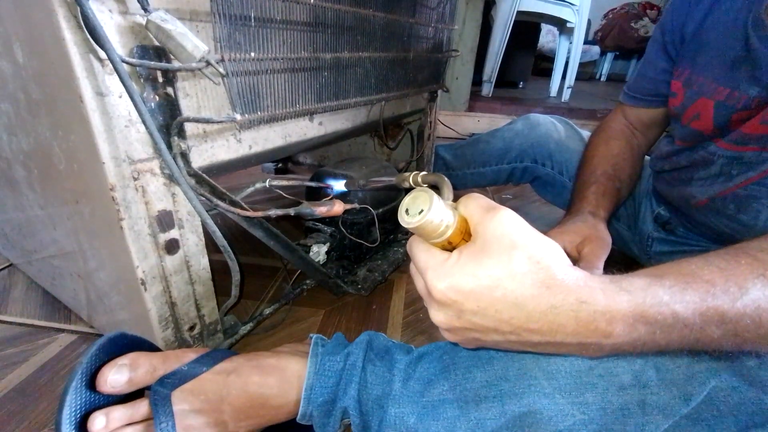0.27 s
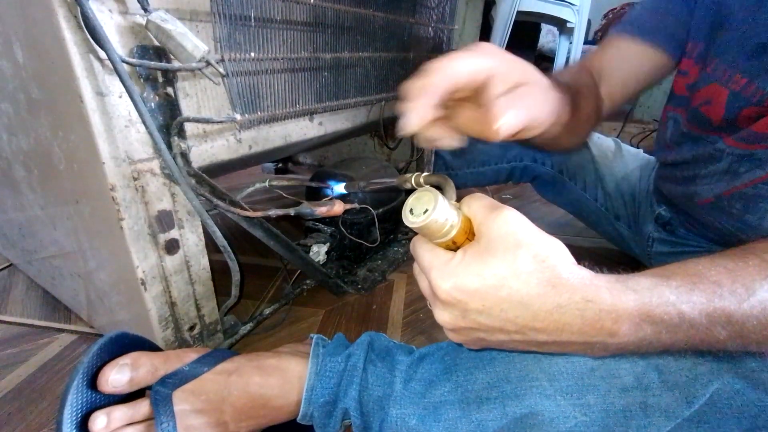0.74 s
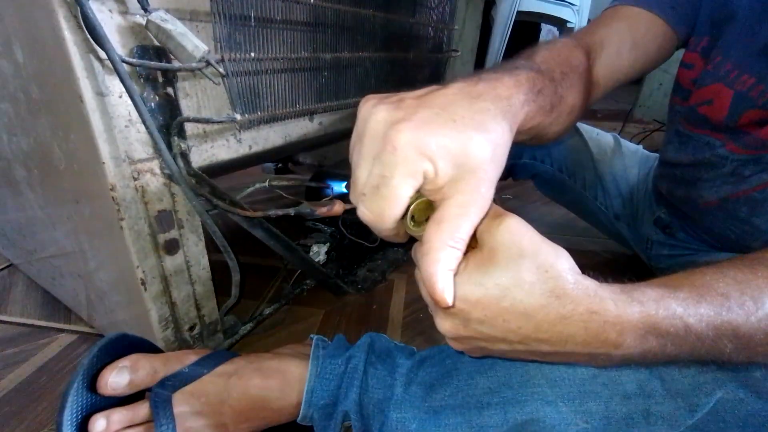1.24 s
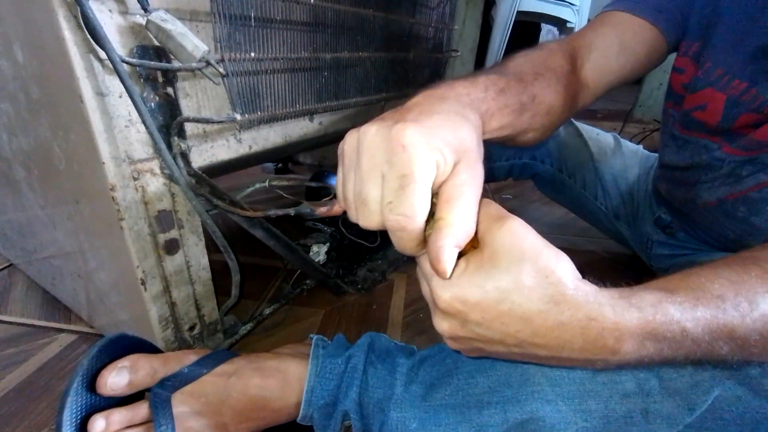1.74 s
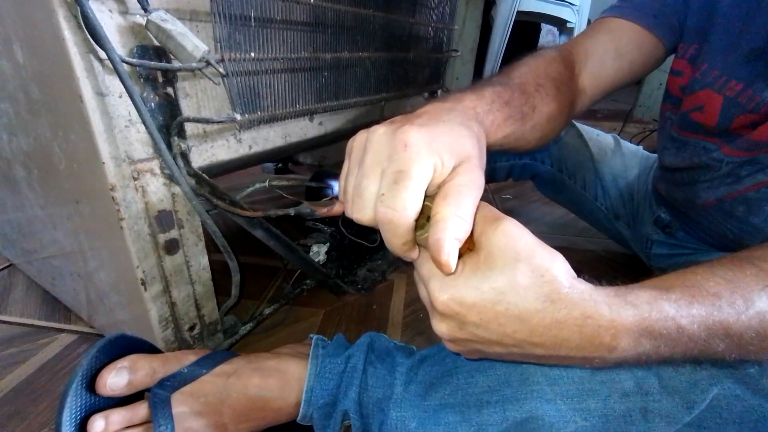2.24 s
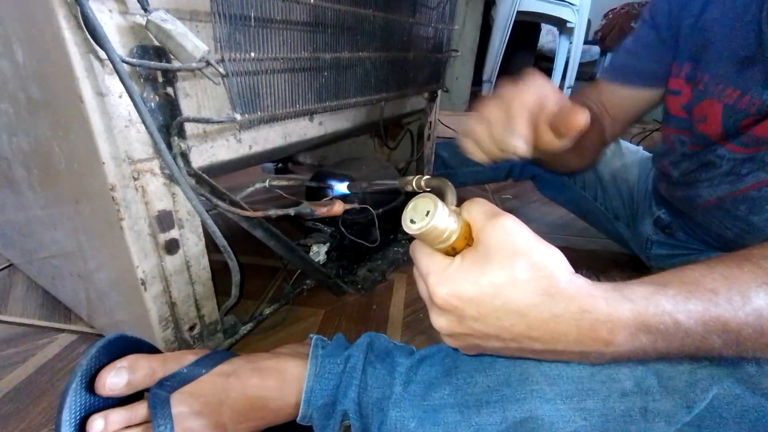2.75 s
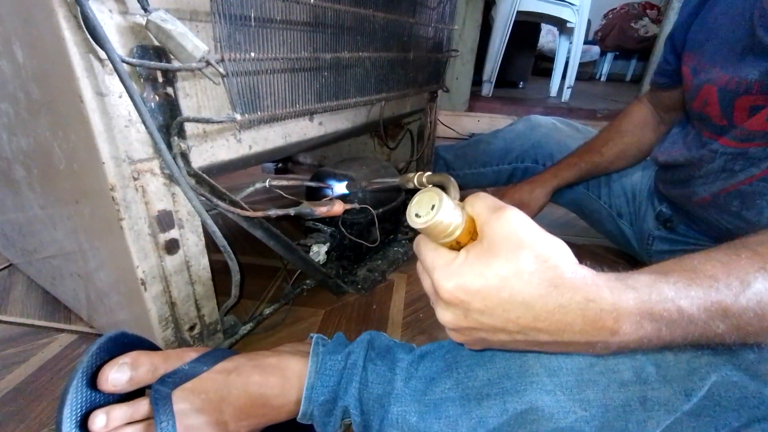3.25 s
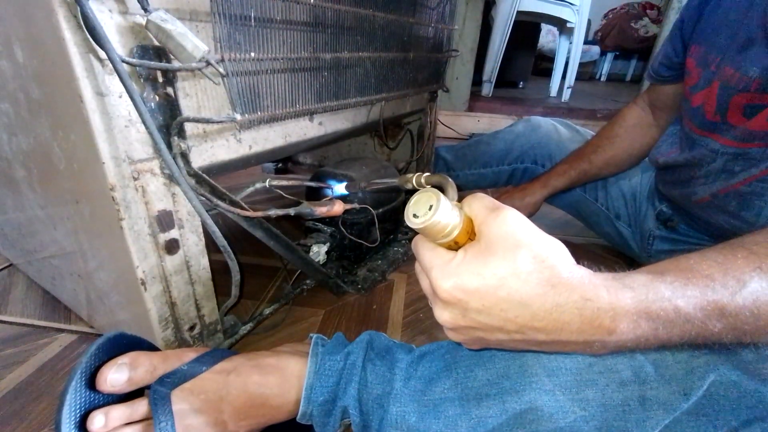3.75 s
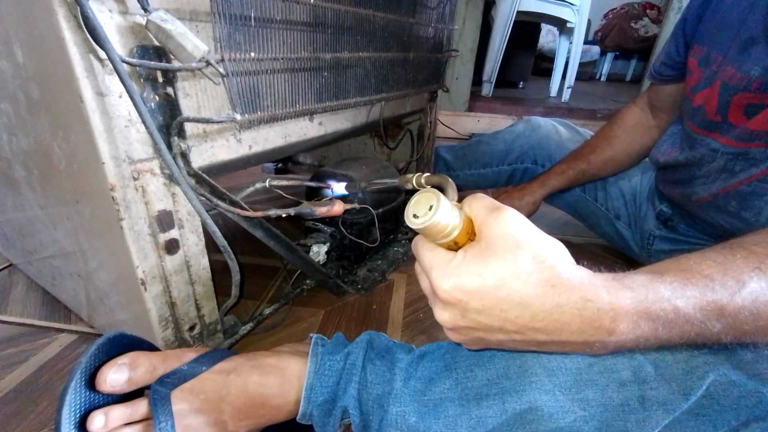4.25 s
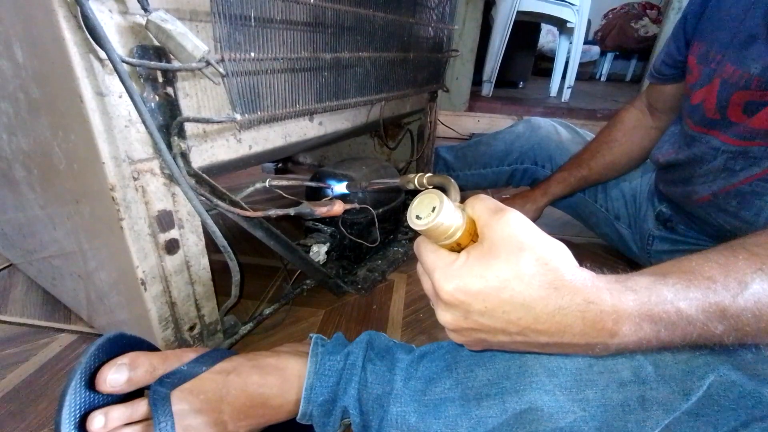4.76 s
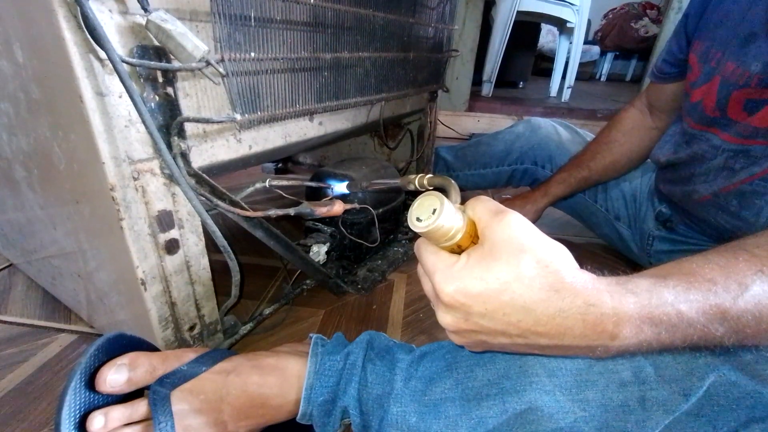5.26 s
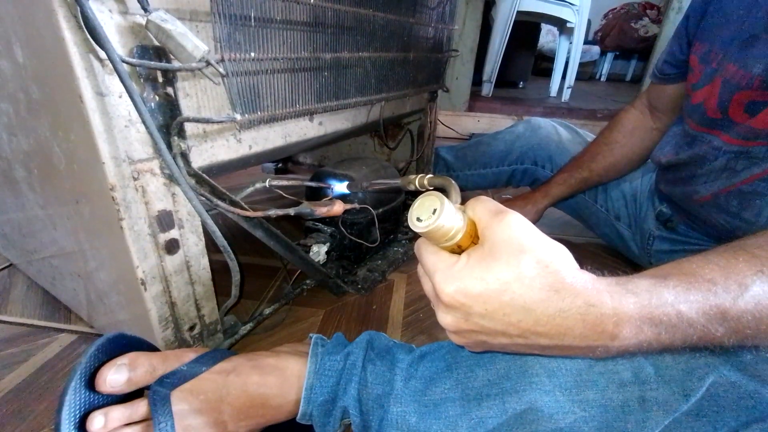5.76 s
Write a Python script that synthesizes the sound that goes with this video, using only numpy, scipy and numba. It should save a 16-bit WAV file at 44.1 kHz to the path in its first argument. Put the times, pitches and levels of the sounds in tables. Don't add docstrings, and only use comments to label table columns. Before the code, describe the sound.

Steady rushing burn of a small gas torch with a hoarse, wandering airy whistle; the valve opens slightly, flame swells, and a knob softly ticks.

```python
import sys
import numpy as np
from scipy import signal
from scipy.fft import rfft, irfft, next_fast_len
from scipy.io import wavfile
from scipy.ndimage import uniform_filter1d
from numba import njit

SR = 44100
rng = np.random.default_rng(int(sys.argv[2]) if len(sys.argv) > 2 else 0)


def transcribe(signal):
    frames = np.atleast_2d(signal).T
    limited = np.clip(frames, -1, 1)
    pcm = np.round(limited * 32767).astype(np.int16)
    wavfile.write(sys.argv[1], SR, pcm)


def volts_from_db(level):
    exponent = np.asarray(level, float) / 20
    return 10 ** exponent


N = 265041
SECONDS = np.arange(N) / SR
SIZE = next_fast_len(N + SR)
HZ = np.maximum(np.arange(SIZE // 2 + 1) * SR / SIZE, 1)

# (time [s], flame strength [dB])
GAS_FLOW = [(0, .5), (.9, -.5), (1.0, 1.5), (1.05, -1), (1.56, 0), (1.6, 4), (1.68, 2), (3.05, 2.5),
            (3.13, 3.5), (3.5, 2.6), (4.1, 3), (4.6, 2.5), (6.01, 2.5)]
# (start [s], rise [s], end [s], fall [s])
REACH, VALVE_TURN = (0.99, .03, 1.53, .06), (1.53, 0.079, 2.29, .45)

# (frequency [Hz], density [dB per Hz])
FLAME_COLOUR = [(20, -36), (45, -45), (100, -27.5), (200, -18.5), (330, -7), (700, -2), (1200, 2),
                (2000, -10), (4000, -9.5), (10500, -13), (10900, -29.5), (13000, -36.5), (15100, -36),
                (15300, -43)]
# (frequency [Hz], width [Hz], level [dB])
RECESS_MODES = [(170, 12, -11), (228.3, 31, 7.5), (259, 47, -5.5), (348.5, 27, 7.5), (391.4, 58, 8.5),
                (488, 61, 4), (660, 35, 2.5), (449.7, 14, -10.5), (558, 54.4, -15.5), (1236, 200, -6),
                (2030, 45, -3.5), (2370, 100, 4), (2830, 80, -5.5), (3090, 125, -4.5), (3286, 140, 3),
                (3725, 176, -7), (4021, 37, 9.5), (4360, 220, -23.5), (4820, 170, -2), (5130, 150, 4),
                (5226, 160, -5.5), (6030, 210, -7.5), (6830, 250, 2.5), (6830, 180, -15), (7660, 550, 7.5),
                (7766, 200, -14.5), (9110, 260, -9), (9490, 200, 6.5), (11900, 250, 8), (11800, 440, -5),
                (14200, 250, -9)]
# (level [dB], slope [dB per dB of flow], under the reaching hand [dB],
# while the valve turns [dB])
FLAME_RANGES = [
    (-30, 0.99, 0.4, 0.04),
    (-30, 0.41, 0.6, 1.2),
    (-49, 3, -5, .1),
    (-28, 0.77, 0.1, -0.2),
]

# (time [s], band centre [Hz])
NOZZLE_GAP = [(0, 1837), (.4, 1766), (.6, 1800), (1.08, 1830), (1.25, 1870), (1.55, 1800), (1.6, 1640),
              (2.05, 1660), (2.3, 1610), (2.45, 1660), (2.77, 1820), (2.92, 1650), (3.65, 1660),
              (4.25, 1630), (4.45, 1800), (4.92, 1630), (5.35, 1740), (6.01, 1740)]
# (time [s], pitch drop [Hz], spread [s], swell [dB])
FLAME_DIPS = [(1.0, 110, 0.035, -0.5), (1.2, 5, 0.041, 6), (1.83, 90, .06, 1.5), (2.54, 210, .04, 3.5),
              (2.92, 10, 0.073, 2.5), (3.48, 45, 0.091, 3), (4.09, 160, .09, 3.5), (5.58, 175, 0.057, 1),
              (5.9, 5, 0.065, 2.5)]
WHISTLE_DB, WHISTLE_PER_FLOW, WHISTLE_DB_PER_HZ, WHISTLE_REACH_DB = -31.5, 1.21, -0.004, -2
REST_HZ, REST_WIDTH_HZ, WIDENING, WIDEST_HZ = 1800, 125, .45, 170
# (frequency [Hz], width [Hz], level [dB])
PIPE_MODES = [(1365, 40, 2.5), (1515, 32, 7.5), (1500, 18, -1.5), (1630, 30, 7), (1690, 11, 6),
              (1738, 17, 0.5), (1810, 35, 4.5), (1842, 42, 5.5), (2000, 150, -1.5)]

# (time [s], swell [dB], spread [s])
FLAME_LICKS = [(0.0, 5, .03), (1.0, 8, 0.027), (1.84, 7.5, 0.094), (2.35, 7.5, 0.069), (2.53, 6, 0.036),
               (3.5, 6, .4), (4.4, 3, 0.32), (5.05, 4, 0.22), (5.55, 8, .06), (5.93, 8, .05)]
LICK_DB, LICK_PER_FLOW, LICK_REACH_DB = -38, 1.1, -11

# (frequency [Hz], density [dB per Hz])
LEAK_COLOUR = [(3500, -43), (4300, -1), (4900, -3), (6000, -16), (10500, -25), (11300, 1), (11750, -10),
               (12100, -3), (12700, -7), (13200, -25)]
LEAK_SHUT_DB, LEAK_OPEN_DB = -71, -40
# time [s], peak [dB], frequency [Hz], T60 [s]
KNOB_TICK = (2.739, -14, 900, .012)

ROOM_T60_S, ROOM_GAP_S, WALL_HZ, ROOM_DB = 0.53, 0.00435, (920, 7260), -6
# (time [s], turn [rad])
TORCH_SWAY = [(0, 0), (1.0, .2), (1.1, .7), (1.55, .8), (1.62, 1.6), (2.6, 2.2), (4.1, 2.7), (6.01, 3.3)]
# (frequency [Hz], width [Hz], level [dB])
HAND_SHADOW = [(4750, 350, -4), (5820, 150, -4), (6700, 200, -3), (8000, 900, -2.5)]
# (frequency [Hz], share of time dropped [0-1])
DROPPED_SHARE = [(4200, 0), (4400, .22), (4600, 0), (10700, 0), (11100, .3), (11500, .15), (12000, .6),
                 (12500, .22), (13300, .38), (13900, .25), (14300, .45), (14800, .15), (15100, .18),
                 (15300, .65), (15700, .65)]
# time [s], spread [s], level [dB]
CHANNEL_GLITCH = (5.014, 0.0074, -35)


def rms_one(x):
    return x / np.sqrt(np.mean(x ** 2) + 1e-20)


def in_time(rows):
    s, *columns = np.transpose(rows)
    return [np.interp(SECONDS, s, column) for column in columns]


def held(start, rise, end, fall):
    return np.interp(SECONDS, [start, start + rise, end, end + fall], [0, 1, 1, 0])


def bump(s, spread):
    return np.exp(-.5 * ((SECONDS - s) / spread) ** 2)


def on_hz(points):
    hz, level_db = np.transpose(points)
    return np.interp(np.log(HZ), np.log(hz), level_db)


def bells_db(table):
    return sum(level_db / (1 + (2 * (HZ - hz) / width) ** 2) for hz, width, level_db in table)


def step_up(edge_hz):
    return 1 / (1 + (edge_hz / HZ) ** 30)


def shaped(x, gain):
    return irfft(rfft(x, SIZE) * gain, SIZE)[:N]


def drift(rate):
    r = np.exp(-80 * np.pi * rate / SR)
    noise = rng.standard_normal(N // 40 + 2002)
    slow = signal.lfilter([1], [1, -2 * r, r * r], noise)[2000:]
    return np.interp(np.arange(N) / 40, np.arange(len(slow)), rms_one(slow))


def flicker(rate):
    quick = drift(rate)
    return rms_one(quick - uniform_filter1d(quick, size=SR // 5))


def flame(flutter_db):
    low, mid, high = step_up(1680), step_up(4270), step_up(5180)
    shares = [1 - low, low - mid, mid - high, high]
    common_flutter = [0.96, 0.58, 0.67, 0.46]
    own_flicker_db = [0.7, 1.18, 2.1, 0.64]
    colour = volts_from_db(on_hz(FLAME_COLOUR) + bells_db(RECESS_MODES))
    flow_db = in_time(GAS_FLOW)[0]
    out = 0
    for row, share, common, own_db in zip(FLAME_RANGES, shares, common_flutter, own_flicker_db):
        base_db, per_flow, reach_db, turn_db = row
        level_db = base_db + per_flow * flow_db + reach_db * held(*REACH) + turn_db * held(*VALVE_TURN)
        noise = rng.standard_normal(N) * volts_from_db(common * flutter_db + own_db * flicker(31))
        burning = shaped(noise, colour * np.sqrt(np.maximum(share, 0)))
        out = out + volts_from_db(level_db - 0.43) * rms_one(burning)
    return out


@njit
def moving_band(x, centre_hz, width_hz, sr):
    out = np.zeros(len(x))
    for i in range(2, len(x)):
        r = np.exp(-np.pi * width_hz[i] / sr)
        drive = np.sqrt(1 - r * r) * (x[i] - x[i - 2])
        out[i] = drive + 2 * r * np.cos(2 * np.pi * centre_hz[i] / sr) * out[i - 1] - r * r * out[i - 2]
    return out


def whistle(flutter_db):
    centre_hz = in_time(NOZZLE_GAP)[0]
    swells_db = 0
    for s, drop_hz, spread, swell_db in FLAME_DIPS:
        centre_hz = centre_hz - drop_hz * bump(s, spread)
        swells_db = swells_db + swell_db * bump(s, spread)
    level_db = WHISTLE_DB + WHISTLE_PER_FLOW * in_time(GAS_FLOW)[0] + swells_db
    level_db = level_db + WHISTLE_DB_PER_HZ * (centre_hz - REST_HZ) + WHISTLE_REACH_DB * held(*REACH)
    width_hz = np.minimum(REST_WIDTH_HZ + WIDENING * (REST_HZ - centre_hz), WIDEST_HZ)
    centre_hz = centre_hz * (1 + .008 * drift(12))
    noise = rng.standard_normal(N) * volts_from_db(0.81 * flutter_db + 0.95 * flicker(26))
    once = moving_band(noise, centre_hz, width_hz, SR)
    twice = moving_band(once, centre_hz, 1.95 * width_hz, SR)
    return volts_from_db(level_db) * rms_one(twice)


def lick(flutter_db):
    swells_db = sum(swell_db * bump(s, spread) for s, swell_db, spread in FLAME_LICKS)
    level_db = LICK_DB + LICK_PER_FLOW * in_time(GAS_FLOW)[0] + LICK_REACH_DB * held(*REACH) + swells_db
    noise = rng.standard_normal(N) * volts_from_db(flutter_db)
    hollow = shaped(noise, 1 / (1 + ((HZ - 1420) / 110) ** 4))
    return volts_from_db(level_db - 2) * rms_one(hollow)


def leak():
    level_db = LEAK_SHUT_DB + (LEAK_OPEN_DB - LEAK_SHUT_DB) * held(*VALVE_TURN)
    hiss = shaped(rng.standard_normal(N), volts_from_db(on_hz(LEAK_COLOUR)))
    return volts_from_db(level_db + 1.5 * drift(15)) * rms_one(hiss)


def tick():
    s, peak_db, hz, t60 = KNOB_TICK
    t = np.maximum(SECONDS - s, 0)
    knock = volts_from_db(peak_db - 60 * t / t60) * np.sin(2 * np.pi * hz * t)
    return shaped(knock, 1 / (1 + (400 / HZ) ** 4))


def room(x):
    lead = SR // 2
    t = np.arange(lead) / SR
    tails = rng.standard_normal((2, lead)) * volts_from_db(-60 * t / ROOM_T60_S) * (t > ROOM_GAP_S)
    tails = signal.lfilter(*signal.butter(1, WALL_HZ, "band", fs=SR), tails)
    tails = volts_from_db(ROOM_DB) * tails / np.sqrt(np.sum(tails ** 2, axis=1, keepdims=True))
    burning = np.concatenate([x[lead:0:-1], x])
    first, second = signal.fftconvolve(burning[None], tails, axes=1)[:, lead:lead + N]
    turn = in_time(TORCH_SWAY)[0]
    return (x + np.cos(turn) * first + np.sin(turn) * second) / np.sqrt(1 + volts_from_db(2 * ROOM_DB))


def hand_shadow(x):
    return x + held(*REACH) * (shaped(x, volts_from_db(bells_db(HAND_SHADOW))) - x)


def drop_bands(x):
    hz, s, frames = signal.stft(x, SR, nperseg=1024)
    band = (hz // 215).astype(int)
    chance = rms_one(uniform_filter1d(rng.standard_normal((band[-1] + 1, len(s))), size=8))
    rank = 1 / (1 + np.exp(-1.7 * chance[band]))
    hz = hz[:, None]
    turning = held(*VALVE_TURN)[np.minimum((s * SR).astype(int), N - 1)]
    share = np.interp(hz, *np.transpose(DROPPED_SHARE), left=0)
    share = share * np.where(hz < 13200, 1 - turning, 1)
    thinned = (hz > 13200) & (hz < 14500) & (s > 1.82) & (s < 2.3)
    kept = rank > share + .62 * thinned
    return signal.istft(frames * kept / np.sqrt(1 - share), SR, nperseg=1024)[1][..., :N]


def scene():
    flutter_db = 0.82 * flicker(24)
    ringing = shaped(whistle(flutter_db) + lick(flutter_db), volts_from_db(bells_db(PIPE_MODES) - 3.5))
    mono = hand_shadow(room(flame(flutter_db) + ringing + leak() + tick()))
    return np.stack([mono, mono])


def top_cut(x):
    return signal.sosfilt(signal.butter(12, 15740, fs=SR, output="sos"), x)


def record(dry):
    at, spread, level_db = CHANNEL_GLITCH
    band_pass = signal.butter(6, [5150, 6350], "band", fs=SR, output="sos")
    band = signal.sosfilt(band_pass, rng.standard_normal(N))
    differ = volts_from_db(level_db) * rms_one(band) * bump(at, spread)
    mix = drop_bands(dry[0]) + differ * [[1], [-1]]
    return top_cut(mix)


dry = scene()
out = record(dry)
transcribe(out)
```